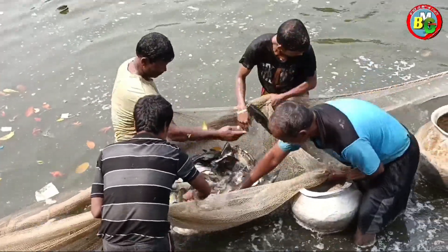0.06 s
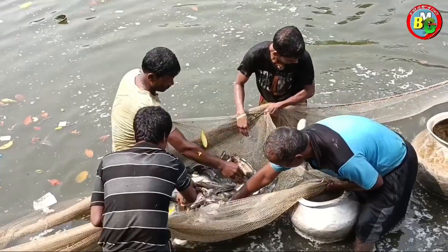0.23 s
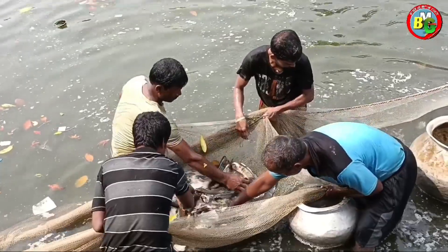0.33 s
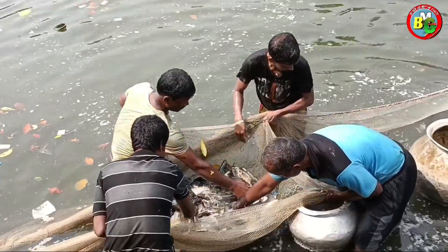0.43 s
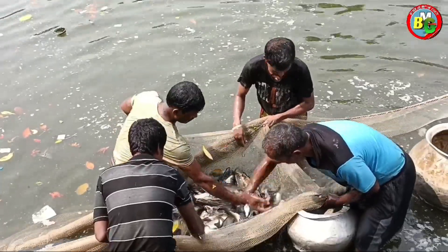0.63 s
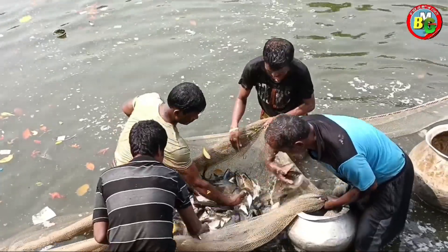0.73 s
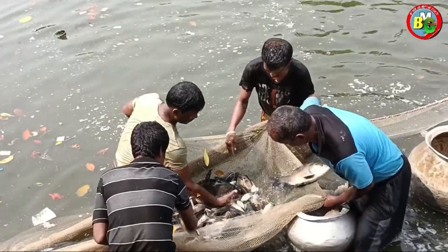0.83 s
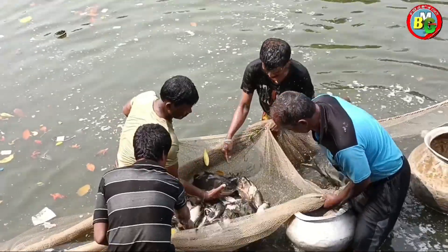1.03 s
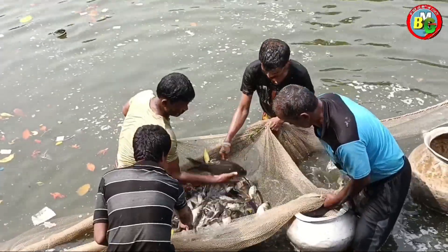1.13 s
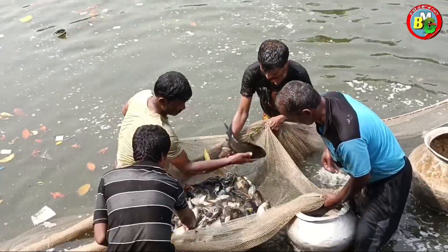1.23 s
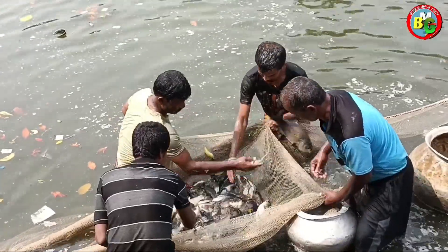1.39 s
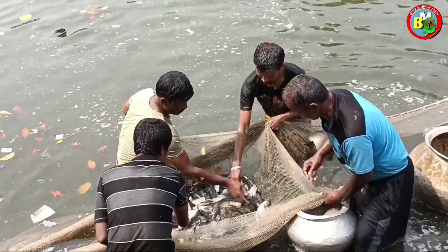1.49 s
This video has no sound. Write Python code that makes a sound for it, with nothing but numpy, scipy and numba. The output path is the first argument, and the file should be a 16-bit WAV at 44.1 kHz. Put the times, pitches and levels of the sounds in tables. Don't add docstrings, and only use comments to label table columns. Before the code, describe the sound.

Small watery splashes from netted fish: an earlier splash fades, plops and ringing bubbles cluster, a sharp slap peaks past the middle, then spray and drips continue. Open pond, microphone a few metres away, soft low rumble.

```python
import sys
import numpy as np
from scipy import signal
from scipy.fft import rfft, irfft
from scipy.io import wavfile
from scipy.ndimage import map_coordinates
from numba import njit

SR = 44100
rng = np.random.default_rng(int(sys.argv[2]) if len(sys.argv) > 2 else 0)


def invert_db(level):
    return 10 ** (np.asarray(level, dtype=float) / 20)


def generate_wav(sig):
    pcm = np.round(np.clip(np.atleast_2d(sig).T, -1, 1) * 32767).astype(np.int16)
    wavfile.write(sys.argv[1], SR, pcm)


N = 68355
GLIDE = 0.022


def curve(table, hz, column=1):
    rows = np.array(table, float)
    return np.interp(np.log(np.maximum(hz, 1)), np.log(rows[:, 0]), rows[:, column])


def level(x, db):
    return x * invert_db(db) / np.sqrt(np.mean(x ** 2))


@njit
def ring(start, hz, t60, rise, glide, size, count, sr):
    out = np.zeros(count)
    for k in range(len(start)):
        first, length = int(start[k] * sr) + 1, int(t60[k] * sr)
        for i in range(max(first, 0), min(first + length, count)):
            t = i / sr - start[k]
            swell = 1 - np.exp(-t / rise[k])
            decay = np.exp(-6.9 * t / t60[k])
            phase = 6.2832 * hz[k] * t * (1 + glide * t / t60[k])
            out[i] += size[k] * swell * decay * np.sin(phase)
    return out


def bubbles(start, hz, t60, db, rise, glide):
    pan_scatter_db, lag_scatter_s = 3, .00002
    lag, pan = rng.standard_normal((len(start), 2)).T
    hz, rise = np.clip(hz, 50, .4 * SR), rise + 0 * start
    ports = []
    for side in (1, -1):
        heard = start + side * lag_scatter_s * lag
        size = invert_db(db + side * pan_scatter_db * pan)
        ports.append(ring(heard, hz, t60, rise, glide, size, N, 1. * SR))
    return np.array(ports)


def burst(rows, scatter_db, rise_s, count):
    rows = np.array(rows, float)
    u, colour, e = rng.random((len(rows), 3, count)).transpose(1, 0, 2)
    t60 = np.abs(rows[:, 3:4])
    late = t60 * 0.66 * ((np.arange(count) + u) / count) ** 1.1
    swell_db = 20 * np.log10(1 - .9 * np.exp(-late / rise_s))
    scatter = scatter_db * np.log(np.maximum(e, 1 / 20))
    db = rows[:, 1:2] + swell_db - 60 * late / t60 - scatter
    return rows, rows[:, :1] + late, colour, db


def air():
    # (frequency [Hz], density [dB per Hz])
    rumble_colour = [(25, -1), (60, -17.5), (130, -5.5), (450, -6.5), (1000, -11), (2200, -12), (7000, -64),
                     (14000, -58)]
    same_hz = 1300
    drone_hz, drone_width_hz = 117, 46.5
    hz = np.arange(N // 2 + 1) * SR / N
    mid, side, drone = rfft(rng.standard_normal((3, N)))
    side = side * np.clip(0.19 + hz / same_hz, 0, 1)
    both = np.array([mid + side, mid - side])
    wash = level(irfft(invert_db(curve(rumble_colour, hz)) * both, N), -68.5)
    wash = wash * invert_db(12 * np.exp(-np.arange(N) / SR / 0.14))
    drone = drone * np.exp(-((hz - drone_hz) / drone_width_hz) ** 2)
    return wash + level(irfft(drone, N), -75)


def insect():
    # (time [s], length [s], level [dB])
    trills = [
        (0.864, 0.041, -55),
        (1.103, 0.13, -55.5),
        (1.316, 0.041, -56),
    ]
    trill_hz, edge_s, port_phase, waver_db = 3235, 0.012, 2.06, 1
    t = np.arange(N) / SR
    on = np.zeros(N)
    for start, length, db in trills:
        edges = np.minimum(t - start, start + length - t) / edge_s
        on += invert_db(db) * np.clip(edges, 0, 1)
    steps = np.arange(0, 2, .03)
    waver = np.interp(t, steps, rng.standard_normal(len(steps)))
    tone = np.sin(2 * np.pi * trill_hz * t + np.array([[0], [port_phase]]))
    return on * invert_db(waver_db * waver) * tone


def churn(count=28000):
    # (time [s], level [dB], treble tilt [dB])
    motion = [(0, -48, 0.5), (0.048, -67, 9), (0.156, -65, 10), (.175, -89.5, 22), (0.212, -54, -10),
              (.25, -57, 3), (.36, -56.5, 5), (0.414, -72, 6.5), (0.434, -45.5, -1.5), (.61, -47, -4),
              (0.642, -52.5, -5.5), (0.777, -55.5, 1.5), (0.971, -71.5, 13), (1.031, -45.5, -1.5),
              (1.14, -60.5, 2.5), (1.288, -56, 3.5), (1.386, -71, 5.5), (1.55, -55, 2.5)]
    # (frequency [Hz], level [dB])
    fizz_colour = [(700, -58), (1500, -15.5), (2150, 0.5), (3000, -7), (4300, -11.5), (5300, -5.5),
                   (7500, -14.5), (13000, -21.5)]
    cycles, gain_db, scatter_db = 22.7, 8.5, 1.5
    patch_db, patch_s, treble_ring = 3, 0.09, 0.95
    u, colour, e = rng.random((count, 3)).T
    colour = np.sqrt(colour)
    start, hz = u * N / SR, 700 * (14500 / 700) ** colour
    at, motion_db, bright_db = np.array(motion, float).T
    tilt = np.interp(start, at, bright_db) * np.clip(np.log2(hz / 3000) * 1.2, 0, 1)
    patch_map = rng.standard_normal((80, 30))
    patch = map_coordinates(patch_map, [start / patch_s, colour * 24], order=1, mode="mirror")
    db = np.interp(start, at, motion_db) + tilt
    db = db + curve(fizz_colour, hz) + 7.4 * np.log10(hz / 2200)
    db = db - scatter_db * np.log(np.maximum(e, 1 / 100))
    db = db + patch_db * patch + gain_db - 10 * np.log10(4 * colour)
    t60 = cycles / hz * np.maximum(hz / 2200, 1) ** treble_ring
    return bubbles(start, hz, t60, db, t60 / 6, GLIDE)


def sprays():
    # (time [s], peak level [dB], top band against low [dB], t60 [s])
    showers = [(.216, -48.5, -5, 0.14), (.233, -35, -18.5, 0.074), (.256, -48.5, 12, 0.15),
               (.276, -39.5, -7, 0.075), (.431, -48, 3.5, 0.16), (.499, -42.5, -2, 0.068),
               (.520, -41.5, -3, 0.094), (.580, -46, -2.5, 0.25), (.669, -55, 22.5, 0.14),
               (.681, -43.5, -6, 0.13), (.744, -42.5, 10, 0.056), (.842, -50.5, 1, 0.062),
               (.902, -35, 1, 0.067), (.993, -36.5, 3.5, 0.085), (1.008, -35.5, 5.5, 0.099),
               (1.047, -38.5, -13, 0.094), (1.216, -42.5, -3, 0.17), (1.235, -47, 17.5, 0.11),
               (1.417, -50.5, 6, 0.16), (1.496, -62, 22.5, 0.066), (1.528, -44.5, -9, 0.033)]
    cycles, gain_db, low_hz, top_hz = 25.05, 8, 3414, 16450
    peak_hz, peak_db, peak_width = 5150, 5, .1
    rows, start, colour, db = burst(showers, scatter_db=2.5, rise_s=0.0046, count=300)
    hz = low_hz * (top_hz / low_hz) ** colour
    peak = peak_db * np.exp(-(np.log(hz / peak_hz) / peak_width) ** 2)
    db = db + rows[:, 2:3] * colour + peak
    hz = hz.ravel()
    return bubbles(start.ravel(), hz, cycles / hz, db.ravel() + gain_db, 3.6 / hz, GLIDE)


def drips():
    # (time [s], peak level [dB], frequency [Hz], length [s])
    plops = [(0.13, -52.5, 1380, 0.011), (.125, -56.5, 1068, 0.018), (.135, -64, 2740, 0.022),
             (.131, -41, 2220, 0.017), (0.151, -52, 1326, 0.0083), (0.202, -55.5, 1410, 0.035),
             (0.337, -43.5, 2107, 0.028), (0.578, -57.5, 603, 0.046), (0.589, -50, 1390, 0.014),
             (0.717, -51, 1260, 0.015), (0.777, -59.5, 1360, 0.027), (1.033, -43.5, 1448, 0.019),
             (1.038, -50, 742, 0.039), (1.074, -53.5, 1038, 0.039), (1.082, -39, 1038, 0.0134),
             (.92, -68, 759, 0.12), (1.086, -60, 1860, 0.013), (1.107, -50, 1590, 0.014),
             (1.165, -58, 1600, 0.04), (1.265, -52.5, 438, 0.03), (1.465, -47.5, 2720, 0.028),
             (1.524, -52, 1482, 0.019)]
    lag_s, left_db, waver_db, waver_s = .00016, 2.5, 2.5, .006
    glide, roundness = 0.012, 0.41
    t = np.arange(N) / SR
    start, db, hz, length = np.array(plops, float).T[:, :, None]
    pan_db = left_db + rng.standard_normal((len(plops), 1))
    steps = rng.standard_normal((len(plops), 400))
    waver = np.array([np.interp(t / waver_s, np.arange(400), row) for row in steps])
    waver = invert_db(waver_db * waver)
    ports = []
    for side in (1, -1):
        part = np.clip((t - start - side * lag_s / 2) / length, 0, 1)
        swell = waver * invert_db(db + side * pan_db) * np.abs(np.sin(np.pi * part)) ** roundness
        rising = 1 + glide * (1000 / hz) ** 2 * part
        ports.append(np.sum(swell * np.sin(2 * np.pi * hz * length * part * rising), axis=0))
    return np.array(ports)


def smacks():
    # (time [s], level [dB], frequency [Hz])
    hits = [(0.2375, -36, 4230), (0.68, -25.5, 2500), (0.68, -29, 3940), (.6825, -26, 4860),
            (0.7442, -29, 6170), (0.9061, -9, 2520), (0.903, -11.5, 5200), (0.9954, -26, 5200),
            (1.0109, -12, 5300), (1.0156, -17, 5400), (1.0482, -17.5, 5300), (1.2382, -13, 12170),
            (1.4252, -28, 4000)]
    cycles, gain_db = 9.4, 6.5
    start, db, hz = np.array(hits, float).T
    return bubbles(start, hz, cycles / hz, db + gain_db, 2 / hz, GLIDE)


def plinks():
    # (time [s], peak level [dB], frequency [Hz], t60 [s], left minus right [dB])
    loudest = [(0.2157, -33.5, 3402, 0.025, 9.9), (0.2185, -33, 2734, 0.031, 19.5),
               (0.2172, -38, 2160, 0.046, 27), (0.2377, -32, 4190, 0.012, 16),
               (0.2766, -42, 2234, 0.032, 9), (0.2776, -43, 2310, 0.032, -13),
               (0.4333, -30, 2006, 0.012, 17.2), (0.4314, -39.5, 2690, 0.068, 21),
               (0.4569, -43, 2400, 0.019, 1.0), (0.4686, -29, 2260, 0.011, 9.9),
               (0.4858, -32.5, 2600, 0.016, 12), (0.5036, -35, 2185, 0.038, 21),
               (0.525, -21, 2377, 0.015, 13), (0.533, -39, 2330, 0.0078, 16), (0.535, -40, 2750, 0.03, 18),
               (0.538, -33, 2090, 0.019, 4), (0.5795, -29, 2404, 0.022, 25), (0.594, -38.5, 2913, 0.033, 1),
               (0.599, -29, 2906, 0.01, 14), (0.6053, -33, 2740, 0.007, 13.3),
               (0.6527, -28.5, 2207, 0.026, 19.3), (0.6833, -28.5, 2170, 0.012, 24.8),
               (0.7096, -38, 2123, 0.033, 35), (0.7186, -38.4, 2153, 0.007, 25.7),
               (0.7236, -34, 2160, 0.017, 26), (0.7335, -28, 2180, 0.012, 23),
               (0.904, -14.5, 2280, 0.012, 5), (0.905, -27.5, 4134, 0.0065, 16.6),
               (0.9043, -27, 3440, 0.023, 20), (1.0126, -31.5, 2497, 0.0094, 22),
               (1.0154, -46, 3570, 0.0062, 2.8), (1.026, -39, 2610, 0.034, 15),
               (1.0339, -42, 1960, 0.022, 15), (1.0373, -35, 3150, 0.024, -3),
               (1.0418, -32.5, 3560, 0.013, 15.0), (1.0418, -44, 2320, 0.019, 23.0),
               (1.0582, -42, 1956, 0.064, 25), (1.0927, -32.5, 1981, 0.019, 18),
               (1.2359, -37, 3070, 0.021, 19), (1.2399, -28, 4005, 0.0083, 39.7)]
    gain_db, rise_s, right_lag_s = 5.5, 0.001497, .00005
    start, db, hz, t60, pan_db = np.array(loudest, float).T
    left = 1 / (1 + invert_db(-2 * pan_db))
    ports = []
    for part, late in ((left, 0), (1 - left, right_lag_s)):
        size = invert_db(db + gain_db) * np.sqrt(2 * part)
        heard = start - rise_s + late
        ports.append(ring(heard, hz, np.abs(t60), rise_s + 0 * hz, 0., size, N, 1. * SR))
    return np.array(ports)


def slaps():
    # (time [s], peak level [dB], bubble frequency [Hz], t60 [s], size
    tail_slaps = [(.214, -36.5, 2690, 0.057, 0.29), (.234, -42, 3900, .03, 0.2),
                  (.277, -45, 2330, 0.071, 0.1), (.429, -43, 2060, 0.097, 0.14),
                  (.459, -43, 2490, .06, 0.06), (.483, -40, 2850, 0.056, 0.24), (.499, -45, 2360, 0.092, 0),
                  (.5235, -34, 2310, 0.073, 0.21), (.579, -40, 2260, 0.032, 0.23),
                  (.592, -38, 2960, 0.093, 0.22), (.652, -42.5, 2147, 0.06, 0),
                  (.680, -39.5, 2370, 0.033, 0.1), (.706, -43, 2170, 0.25, 0.02),
                  (.813, -61, 2140, 0.28, 0), (.9032, -27.5, 2530, 0.05, 0.24),
                  (1.009, -40.5, 2750, 0.042, 0.13), (1.022, -41, 2720, 0.22, 0.2),
                  (1.056, -34.5, 2060, 0.085, 0.22), (1.234, -34.5, 2880, 0.033, 0.4),
                  (1.252, -46, 2080, .15, .06), (1.421, -42, 3890, .11, 0.22),
                  (1.526, -46.5, 1817, 0.11, 0.05),
                  (.424, -44, 1750, 0.05, 0),
        (1.005, -44.5, 1420, 0.033, 0.05),
        (1.022, -36, 1490, 0.21, 0.29),
        (1.074, -46, 1570, 0.17, 0.15),
        (1.472, -53, 1670, 0.29, 0.07),
    ]
    gain_db = 18.5
    rows, start, colour, db = burst(tail_slaps, scatter_db=1.5, rise_s=0.0037, count=30)
    spread = np.clip(rows[:, 4:5], .01, 1)
    hz = rows[:, 2:3] * np.exp(spread * 2 * (colour - .4))
    cycles = 20.3 * (0.043 / spread) ** 0.43
    t60 = (cycles / hz).ravel()
    return bubbles(start.ravel(), hz.ravel(), t60, db.ravel() + gain_db, t60 / 6, GLIDE)


def scene():
    # (frequency [Hz], left minus right [dB])
    port_balance = [(400, 0), (1300, 0), (2200, 8), (3100, 4), (4300, 10), (5600, 2), (8000, -1),
                    (9500, -5)]
    bank_t60_s, bank_db, left_lag_s, water_low_hz = .09, -12, 0.0003526, 300
    water = slaps() + sprays() + churn() + smacks()
    t = np.arange(int(.2 * SR)) / SR
    tail = rng.standard_normal((2, len(t))) * invert_db(-60 * t / bank_t60_s) * (t > .002)
    tail = tail * invert_db(bank_db) / np.sqrt(np.sum(tail ** 2, axis=1, keepdims=True))
    water = water + signal.fftconvolve(water, tail, axes=1)[:, :N]
    hz = np.arange(N // 2 + 1) * SR / N
    ports = []
    for side in (1, -1):
        lag = np.exp(-1j * np.pi * side * hz * left_lag_s)
        ports.append(invert_db(side * curve(port_balance, hz) / 2) * lag)
    low_cut = hz ** 2 / (hz ** 2 + water_low_hz ** 2)
    water = irfft(rfft(water) * np.array(ports) * low_cut, N)
    return water + plinks() + drips() + air() + insect()


def low_pass(x):
    return signal.sosfilt(signal.butter(12, 15900, fs=SR, output="sos"), x)


def record(dry):
    dry = signal.sosfilt(signal.butter(2, 45, "high", fs=SR, output="sos"), dry)
    mix = signal.sosfilt(signal.butter(6, 13400, fs=SR, output="sos"), dry)
    return low_pass(mix)


dry = scene()
out = record(dry)
generate_wav(out)
```